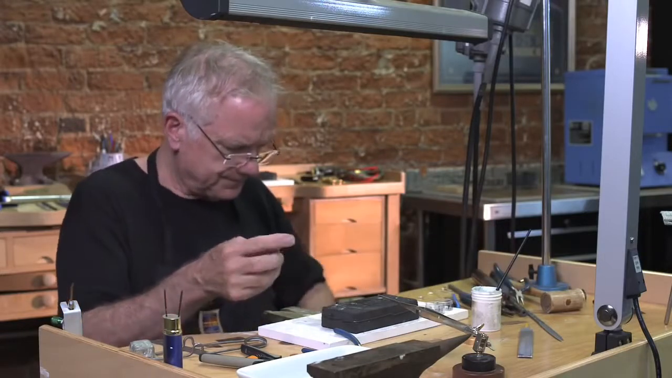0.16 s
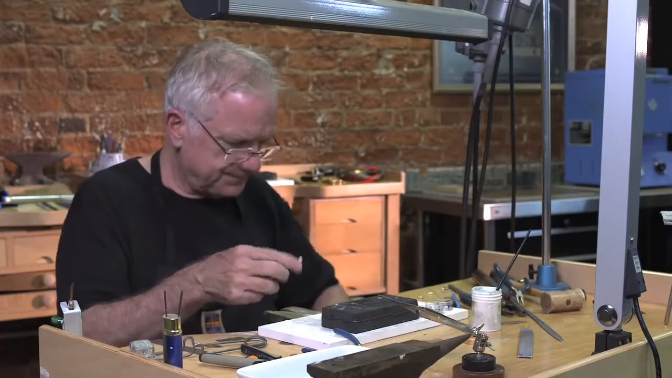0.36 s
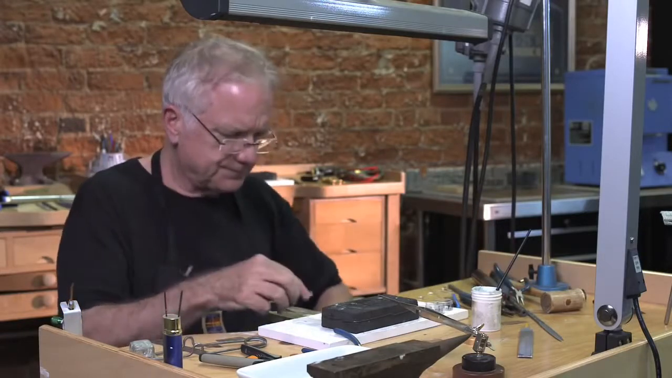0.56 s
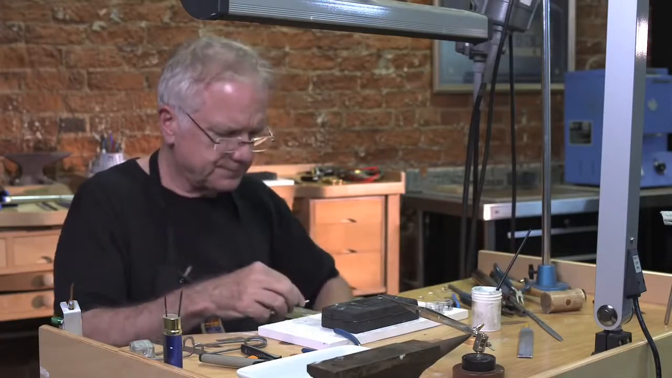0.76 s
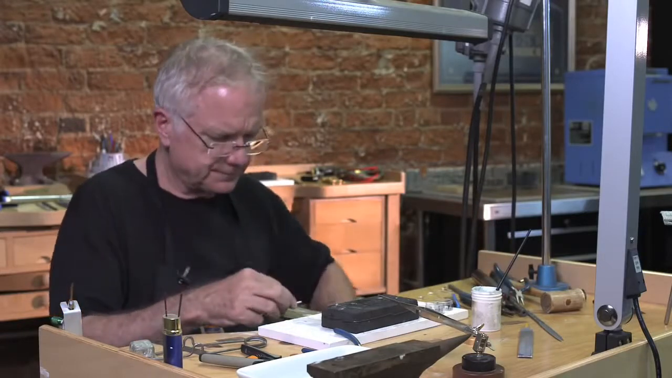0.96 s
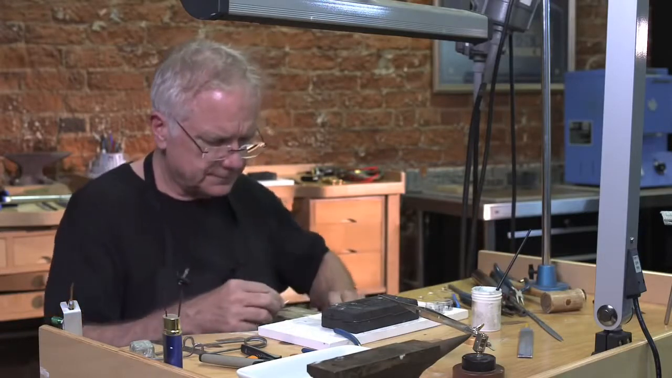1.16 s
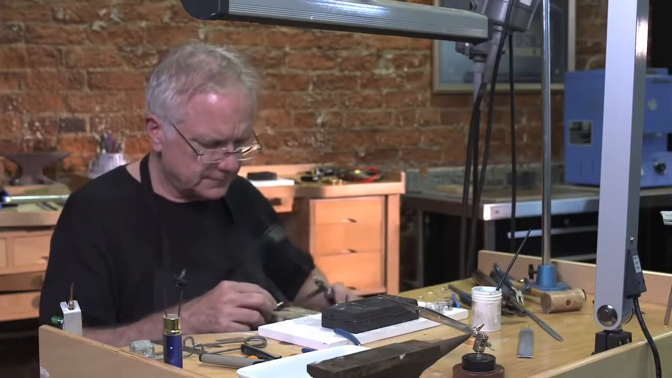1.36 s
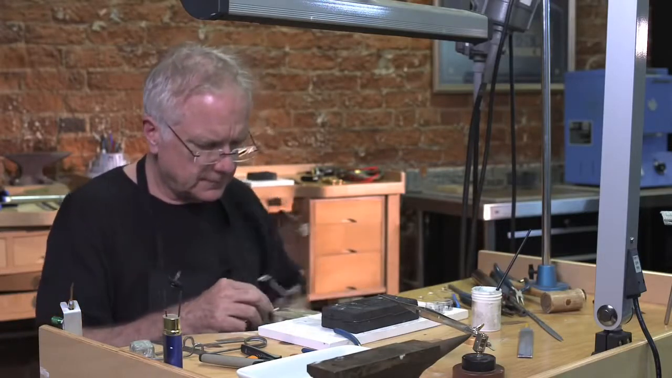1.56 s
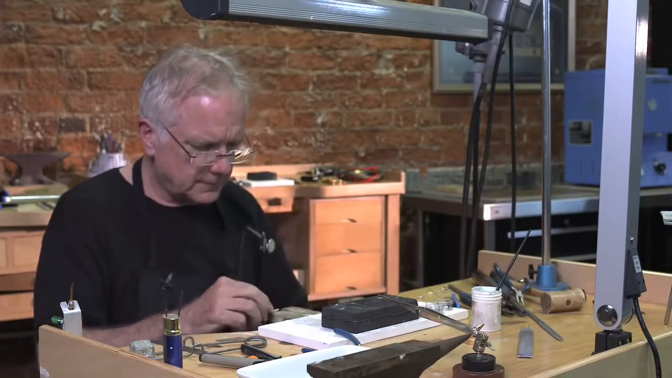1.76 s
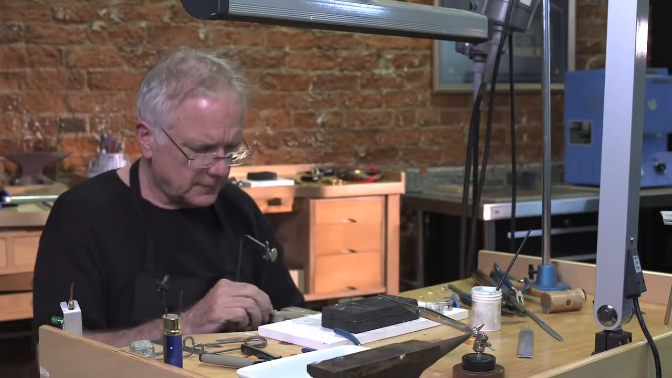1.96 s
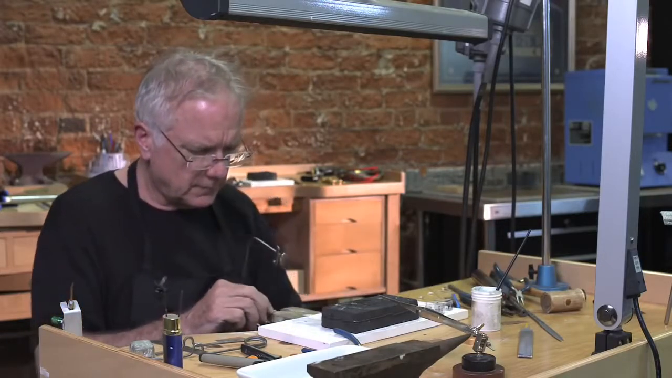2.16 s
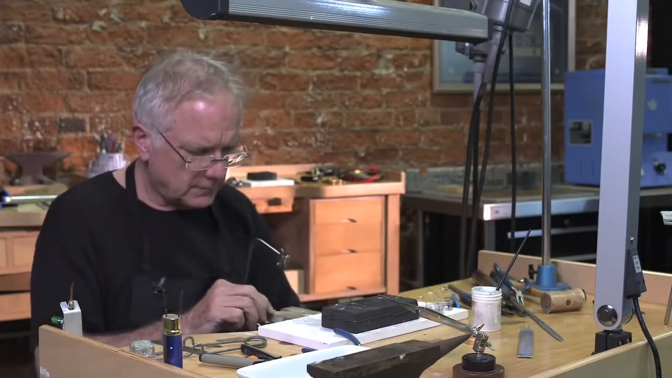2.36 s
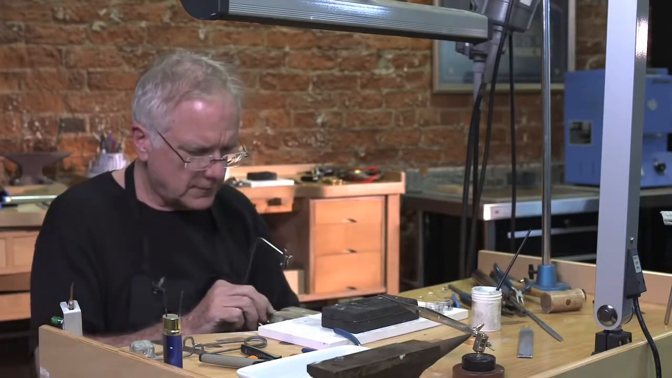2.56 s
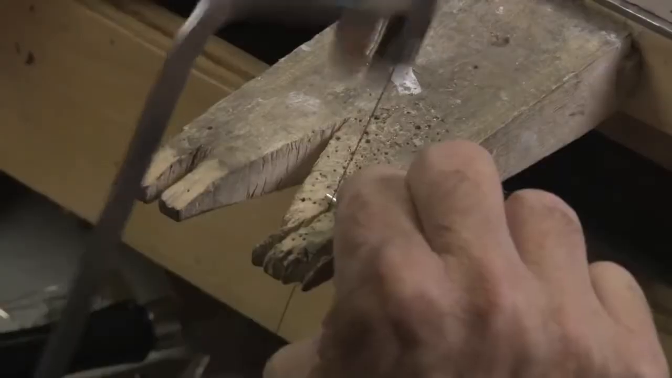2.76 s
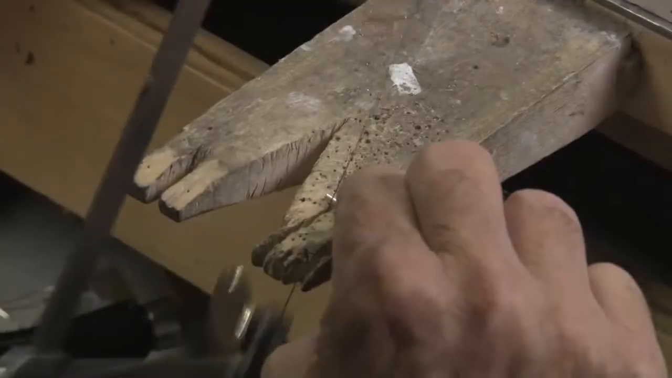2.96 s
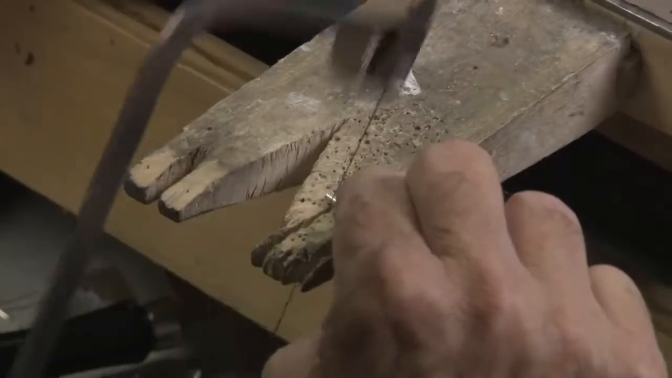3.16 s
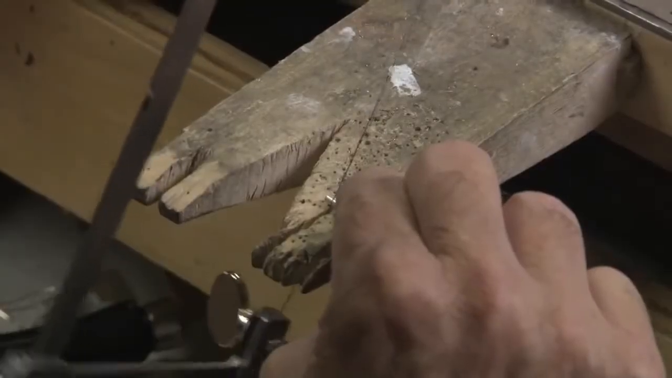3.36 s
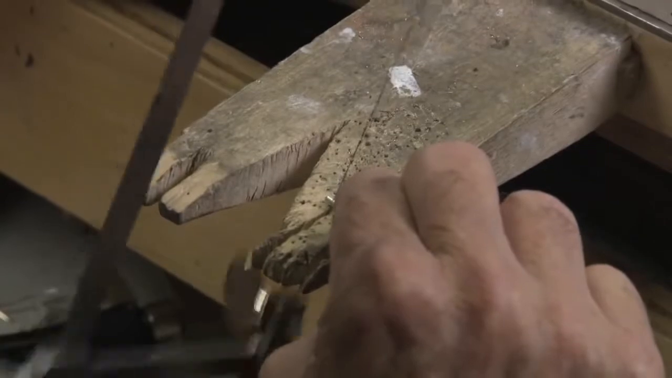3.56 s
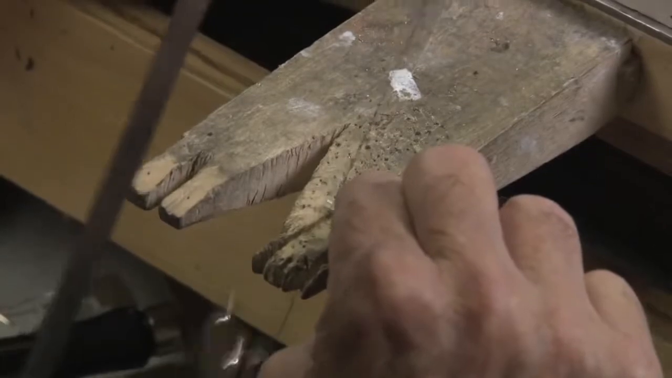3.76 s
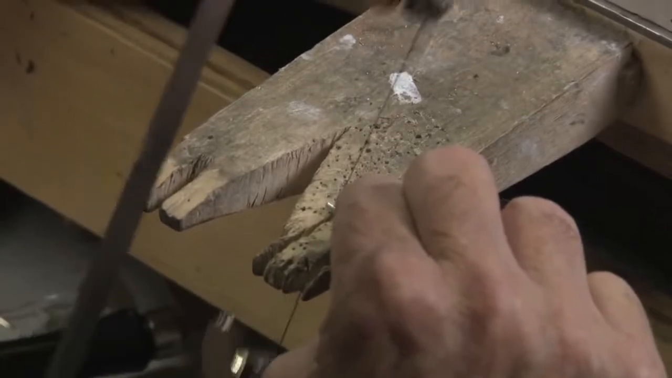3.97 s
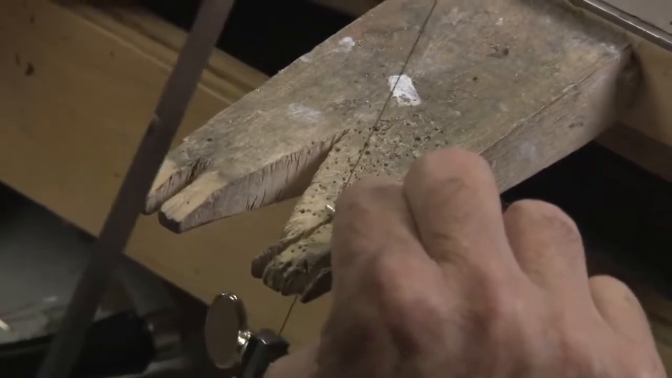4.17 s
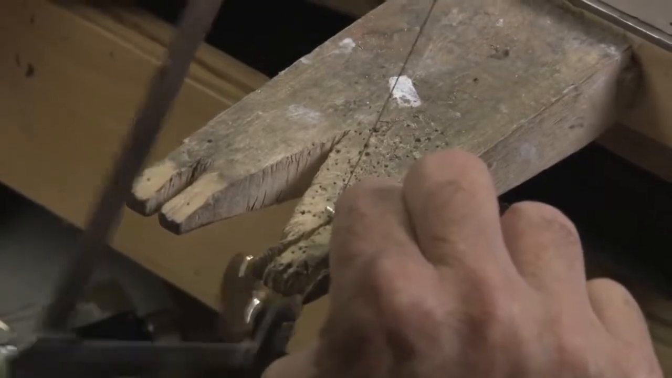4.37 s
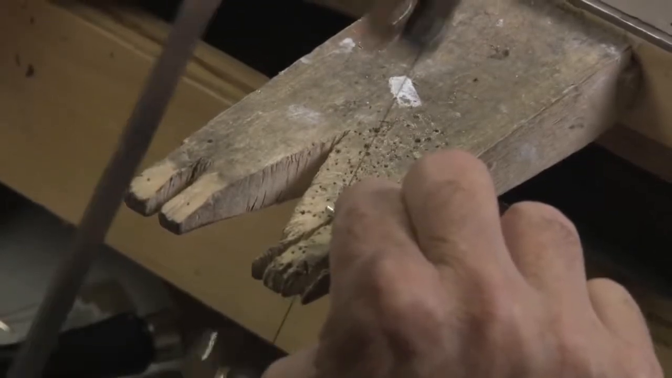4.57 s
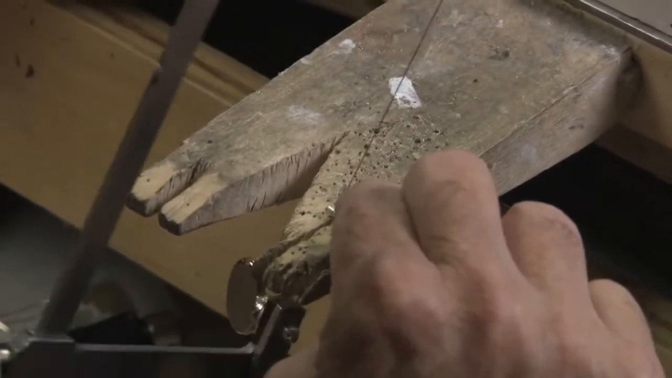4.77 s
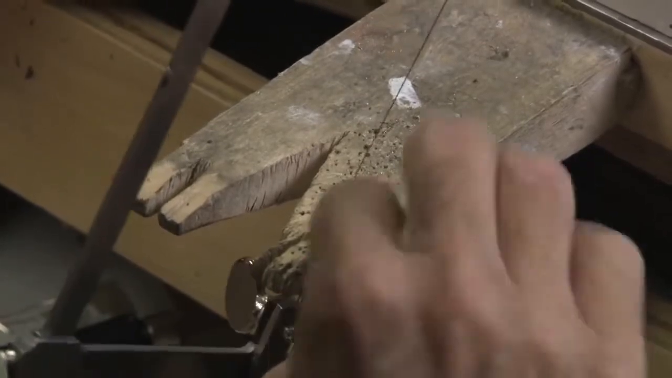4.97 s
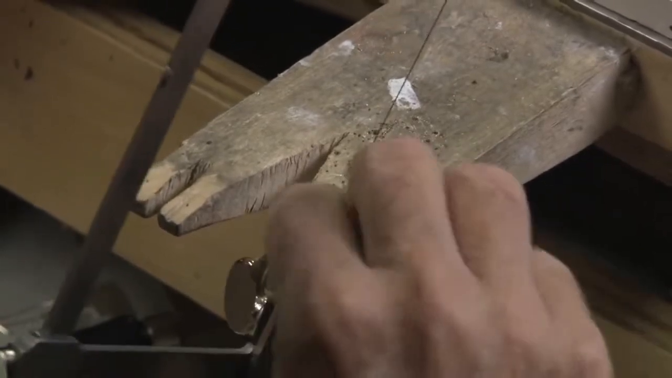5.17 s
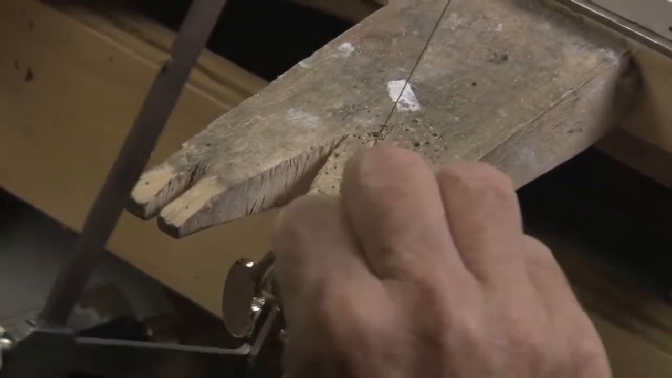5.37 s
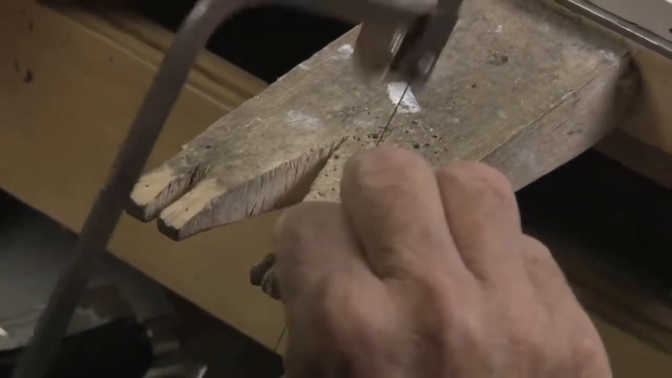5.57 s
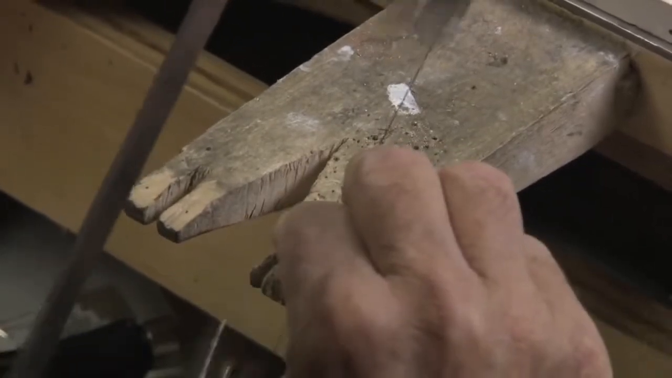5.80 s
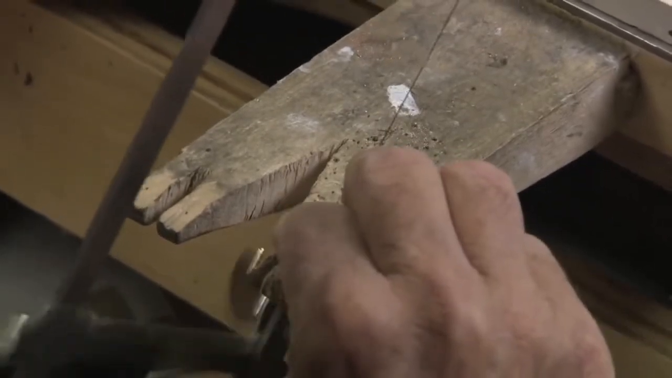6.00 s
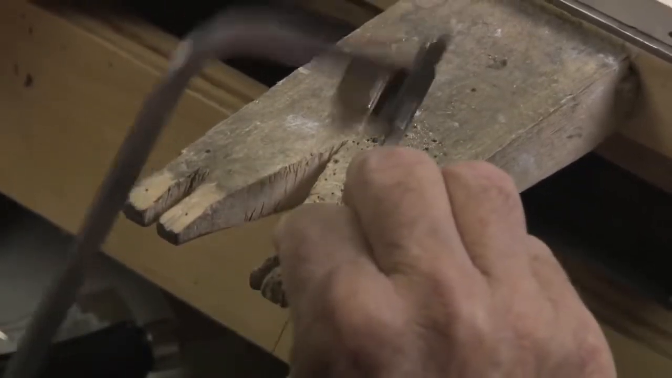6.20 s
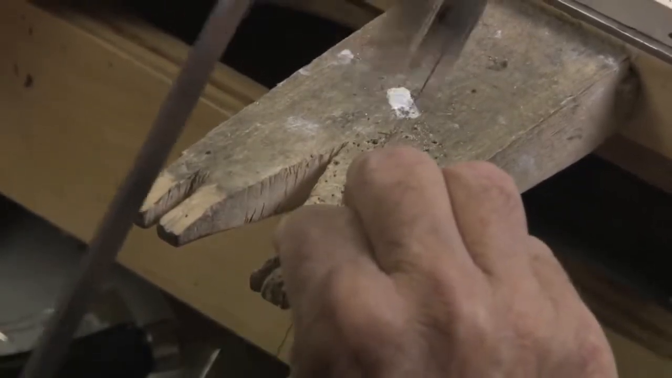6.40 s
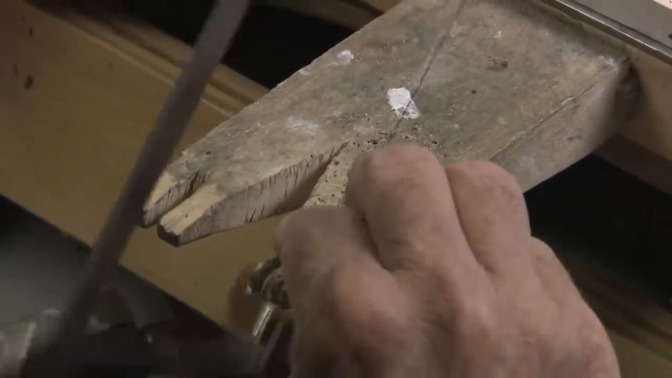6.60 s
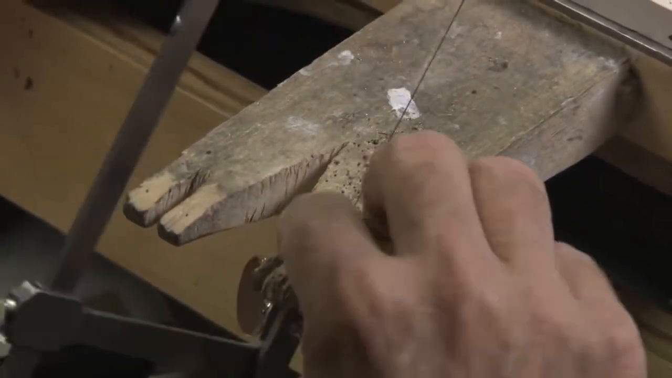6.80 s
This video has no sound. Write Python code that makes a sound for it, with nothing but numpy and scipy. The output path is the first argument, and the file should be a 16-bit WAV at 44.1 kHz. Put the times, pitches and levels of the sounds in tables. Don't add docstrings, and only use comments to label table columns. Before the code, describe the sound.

A close microphone at a wooden bench in a small, quiet workshop with low hum. From 0 to 0.3 s there is only faint handling; from 0.35 to 0.95 s small steel tools knock and slide on wood, with bright tweezer-like ringing around 0.4-0.55, a sharp clack at 0.65 and a tiny high ping near 0.88. Quiet follows, with light ticks at 1.1 and 1.5. At 2.6 s a fine saw catches and rasps thin metal tube: short zipping strokes to 2.9, another pair 2.96-3.3, each rising and falling in pitch. Rougher, snagging strokes come at 3.55-4.05 and 4.2-4.7, slower and grainier around 4 and 4.3, with woody jolts and metallic snaps. A pause holds a soft bench rumble and faint tick. From 5.4 s sawing resumes, soon becoming faster, regular, brighter and squealing, strokes about every 0.15 s, softening by 6.65 into quiet with a faint rumble.

```python
import sys
import numpy as np
from scipy import signal
from scipy.fft import rfft, irfft, next_fast_len
from scipy.io import wavfile
from scipy.ndimage import uniform_filter1d

SR = 44100
rng = np.random.default_rng(int(sys.argv[2]) if len(sys.argv) > 2 else 0)


def invert_db(x):
    u = np.asarray(x, float) / 20
    return 10 ** u


def dump(signal):
    limited = np.clip(np.atleast_2d(signal).T, -1, 1)
    pcm = np.round(limited * 32767).astype(np.int16)
    wavfile.write(sys.argv[1], SR, pcm)


N = 301644
T = np.arange(N) / SR
SIZE = next_fast_len(N + SR // 4)
HZ = np.arange(SIZE // 2 + 1) * SR / SIZE

# start_s, tube_db, pin_db, wall_db, hiss_db
CATCHES = [(2.598, -28.5, -26, -34.5, -42.5), (2.638, -49, -38, -46, -39), (2.65, -25.5, -17, -50, -53),
           (2.965, -32, -65, -36, -51), (3.027, -37, -22, -46, -50), (3.041, -40, -46, -28, -36),
           (3.085, -29, -16.5, -28, -39), (3.29, -39, -22.5, -45, -56), (3.543, -41, -38, -40, -42.5),
           (3.71, -40, -22.5, -45, -49.5), (3.73, -41, -38, -32.5, -45), (3.766, -39, -45, -29, -40),
           (3.777, -48, -45.5, -32, -34), (3.782, -23.5, -16.5, -31, -27.5), (3.856, -38, -25, -58, -46.5),
           (3.91, -51, -51, -50, -57), (3.973, -44, -35, -45, -38.5), (4.057, -50, -40, -52, -64.5),
           (4.074, -52, -42, -57, -65), (4.244, -52, -45, -48, -58), (4.378, -31, -20.5, -38, -56),
           (4.404, -23, -50, -35, -58), (4.418, -39, -33, -26.5, -35), (4.439, -36, -28, -30, -41),
           (4.5, -25, -16.5, -30, -46), (4.528, -47, -40, -43, -46), (4.695, -45, -21.5, -56, -57),
           (5.441, -23.5, -23, -41, -44), (5.493, -35, -22, -42, -58), (5.781, -20.5, -35, -33, -51),
           (5.827, -27, -50, -28.5, -40.5), (6.067, -26.5, -52, -48, -63), (6.42, -33, -21, -34, -36.5)]
SHIFT_S = 5.2


def saw():
    tooth, phase, rough, rate, edge = teeth()
    tube_gain, pin_gain, wall_gain, hiss_gain = cut(rate)
    shifted = T > SHIFT_S
    clean = np.sqrt(1 - rough) * tooth
    drive = clean + np.sqrt(rough) * grit(5000, spread_db=4.0)
    swarf = np.exp(-phase / 0.45) * grit(12000, spread_db=0.5)
    start_s, tube_db, pin_db, wall_db, hiss_db = np.transpose(CATCHES)
    out = tube(tube_gain, drive, clean, edge, shifted, bursts(start_s, tube_db - 10.0, 0.0059))
    wall_drive = 0.74 * (drive + (edge - 1) * clean) + 0.59 * swarf
    out = out + tube_wall(wall_gain * wall_drive + bursts(start_s, wall_db - 7.0, 0.0044))
    jolts = clicks(start_s, invert_db(np.minimum(pin_db, -18) + 8.5))
    out = out + wooden_pin(pin_gain * (drive + 0.48 * grit(500, spread_db=3.5)) + jolts)
    out = out + blade(hiss_gain, drive, swarf, shifted, bursts(start_s, hiss_db - 1.5, 0.0032))
    return out + left_ringing()


# start_s, end_s, mid_stroke_teeth_hz, roughness_0_to_1, far_wall_lag_tooth_gaps
STROKES = [(2.579, 2.71, 796, 0.95, 0.38), (2.714, 2.911, 958, 0.22, 0.075),
           (2.962, 3.13, 1308, 0.56, 0.29), (3.119, 3.317, 943.4, 0.25, 0.19),
           (3.528, 3.67, 905.4, 0.77, 0.18), (3.679, 3.762, 797, 1, 0.26), (3.749, 3.808, 1298, 0.61, 0.18),
           (3.829, 3.893, 592.5, 0.8, 0.39), (3.871, 4.08, 348.4, 0.52, 0.086),
           (4.211, 4.412, 380, 0.46, 0.09), (4.372, 4.472, 1000, 0.6, 0.19),
           (4.479, 4.542, 898.6, 0.63, 0.12), (4.522, 4.728, 676.8, 0.24, 0.13),
           (5.41, 5.534, 1121, 0.4, 0.29), (5.56, 5.729, 980, 0.24, 0.21), (5.766, 5.877, 1399, 0.41, 0.4),
           (5.883, 6.039, 1253, 0.32, 0.42), (6.048, 6.199, 1608, 0.41, 0.35),
           (6.189, 6.342, 1388, 0.42, 0.39), (6.34, 6.495, 1385, 0.45, 0.29),
           (6.501, 6.657, 1311, 0.5, 0.4)]
# settling_share_of_stroke, overtone_db
RUN = [(.1, -10), (0.34, 0), (0.11, -3.5), (.28, -1), (.1, 0), (.1, -1.5), (.1, -0.5), (.1, -1.5),
       (0.11, -1), (0.24, -2.5), (.15, -7), (0.082, 2), (0.25, 0.5), (0.14, 0.5), (0.13, -3), (0.082, 0.5),
       (0.15, -1.5), (0.11, 3.5), (.25, 0), (.1, 2), (0.27, -3.5)]


def teeth():
    rate, rough, lag, edge = np.full(N, 60.), np.ones(N), np.zeros(N), np.ones(N)
    for (start, end, top_hz, r, gap), (settle, edge_db) in zip(STROKES, RUN):
        now = (T >= start) & (T < end)
        progress = (T[now] - start) / (end - start)
        rate[now] = 60 + (top_hz - 60) * np.sin(np.pi * progress)
        clog = (r > .42) * progress
        rough[now] = np.clip(r, .01, 1) ** (1.25 - clog)
        rough[now] **= 1 / (1 + np.exp((settle - progress) / .04))
        lag[now], edge[now] = gap, invert_db(edge_db)
    rate = rate * (1 + .014 * wander(50) + .008 * wander(260))
    rough = rough ** (1.6 * invert_db(2.5 * wander(45)))
    phase = np.cumsum(rate) / SR
    tooth = np.arange(1, int(phase[-1]) - 1)
    spacing, height = rng.standard_normal((4000, 2))[:len(tooth)].T
    jitter = .022 + .06 * np.interp(tooth, phase, rough)
    at = np.interp(tooth + jitter * spacing, phase, T)
    uneven_db = 1.8 * height + 3.2 * np.interp(at, T, wander(70))
    size = np.sqrt(SR / np.interp(at, T, rate)) * invert_db(uneven_db)
    near_wall = 0.96 * clicks(at, size)
    far_size = size * (0.24 + 0.72 * np.interp(at, T, lag))
    far_wall = clicks(at + np.interp(at, T, lag / rate), far_size)
    rough = uniform_filter1d(rough, size=200).clip(0, 1)
    return near_wall + far_wall, phase % 1, rough, rate, edge


# bites_s, heaviest_s, lifts_s, bite_db, heaviest_db
PRESS = [(2.612, 2.667, 2.657, -49, -40.5), (2.72, 2.828, 2.884, -55.5, -41.5),
         (2.963, 3.055, 3.056, -48, -35.5), (3.105, 3.25, 3.29, -52, -40), (3.549, 3.54, 3.62, -49.5, -45),
         (3.698, 3.724, 3.72, -49, -36), (3.768, 3.77, 3.78, -45, -35.5), (3.846, 3.855, 3.98, -60, -58.5),
         (3.918, 3.969, 4.022, -45, -43.5), (4.233, 4.293, 4.31, -60.5, -48.5),
         (4.401, 4.414, 4.43, -45.5, -34), (4.497, 4.498, 4.5, -49, -38), (4.556, 4.596, 4.674, -47, -47),
         (5.438, 5.505, 5.502, -38.5, -31.5), (5.549, 5.615, 5.71, -54.5, -43.5),
         (5.777, 5.837, 5.82, -40, -37.5), (5.885, 5.9, 6.02, -66, -49.5), (6.062, 6.089, 6.15, -48, -40.5),
         (6.196, 6.27, 6.33, -55.5, -49.5), (6.362, 6.43, 6.446, -50.5, -43),
         (6.49, 6.503, 6.64, -68, -63.5)]
# firmness_on_pin_db, dryness_of_blade_db
SEAT = [(2, 2.5), (-2, 3), (-2, 2), (-4, 2), (5.5, 1.5), (5.5, -10), (4, 1), (2, 4), (-3, 4), (0, 2),
        (4, 1.5), (-6.5, 5.5), (-4.5, 2), (-0.5, -4.5), (-5.5, -4.5), (-1.5, -5), (-4.5, -1), (2.5, -1.5),
        (-1, -1.5), (5, -3.5), (-10.5, 1)]
BITE_DB_S, PIN_BITE_DB_S, SAG_DB_S, LIFT_DB_S = 1001, 1297.5, 60, 559.5
DULL_DB_S = 302
EDGE = 0.32
PIN_DB, WALL_DB, HISS_DB = -1.5, -4.5, -10
PIN_DB_OCT, WALL_DB_OCT, HISS_DB_OCT = -5, 3.5, 3.5


def cut(rate):
    octaves = uniform_filter1d(np.log2(rate / 800), size=400).clip(-2.2, 1)
    tube_gain, pin, wall, hiss = np.zeros((4, N))
    for row, (firm_db, dry_db) in zip(PRESS, SEAT):
        lifts_s, heaviest_db = row[2], row[4]
        db = weight(*row, BITE_DB_S, SAG_DB_S, LIFT_DB_S)
        pin_db = weight(*row, PIN_BITE_DB_S, SAG_DB_S, LIFT_DB_S) + firm_db
        bright_db = db + dry_db - DULL_DB_S * (T - lifts_s).clip(0)
        tube_gain = tube_gain + invert_db(db)
        pin = pin + invert_db(pin_db)
        wall = wall + invert_db(bright_db)
        hiss = hiss + invert_db(bright_db + 0.38 * dry_db + EDGE * (db - heaviest_db))
    pin = pin * invert_db(PIN_DB + PIN_DB_OCT * octaves)
    wall = wall * invert_db(WALL_DB + WALL_DB_OCT * octaves)
    hiss = hiss * invert_db(HISS_DB + HISS_DB_OCT * octaves)
    return tube_gain, pin, wall, hiss


# freq_hz, level_db_per_hz
TUBE = [(250, -23.5), (430, -14), (503, 5), (643, -6), (689, 0), (795, 2.5), (869, 0), (989, -8),
        (1190, -5), (1400, -6.5), (1830, -4), (2200, -8.5), (2860, -61), (4840, -120)]
# freq_hz, width_hz, level_db
SQUEAL = [(838, 44, 11.5), (1190, 100, -2.5), (1800, 130, -12), (2520, 82, -11), (3730, 150, -4.5)]
# freq_hz, width_hz, level_db
SQUEAL_SHORT = [(856, 50, 4), (1173, 33, -2.5), (1512, 30, -5.5), (1797, 35, 3), (2533, 177, -12.5),
                (2850, 44.2, -17), (3229, 94.7, -15), (3672, 40, -13)]


def tube(gain, drive, clean, edge, shifted, jolts):
    out = colour(0.92 * gain * drive + jolts, TUBE)
    out = out + ring(0.46 * ~shifted * gain * clean, SQUEAL)
    return out + ring(0.82 * shifted * edge * gain * clean, SQUEAL_SHORT)


# freq_hz, level_db_per_hz
TUBE_WASH = [(1410, -22.5), (2400, -6), (2520, 2), (2720, -5), (2870, -0.5), (3040, -8.5), (3250, 0.5),
             (3440, -5.5), (3700, 1), (4110, -8), (5200, -15), (6760, -32.5), (11400, -120)]


def tube_wall(x):
    return colour(x, TUBE_WASH)


# freq_hz, width_hz, level_db
PIN = [(110.6, 15, -7), (203, 39, -13), (250, 22.2, 2.5), (363.5, 37.5, -8)]


def wooden_pin(x):
    return ring(x, PIN)


# freq_hz, level_db_per_hz
BLADE = [(2940, -27.5), (5000, 3), (5640, 1), (6030, 2), (6550, 2), (7070, 6), (8250, -1.5), (8910, 2.5),
         (10400, -3.5), (11800, -11), (13000, -7), (13400, -5), (14100, -10), (14800, -19.5),
         (15800, -11.5)]
# freq_hz, width_hz, level_db
SNAP = [(4460, 1700, 2.5), (9200, 2300, 3), (14130, 2200, 1.5)]
# freq_hz, width_hz, level_db
BLADE_MODES = [(4750, 120, 0), (4960, 160, 1), (6130, 220, -3.5), (7010, 190, -0.5), (7230, 100, -3),
               (7200, 43, -3), (8750, 58, 1.5), (9640, 260, -6), (10800, 28, -10), (13100, 71, -8.5),
               (13000, 64, -2), (14900, 140, -2.5), (15000, 58, -6)]
# freq_hz, width_hz, level_db
CLAMP_MODES = [(4730, 67, -1.5), (5300, 75.9, -3), (5992, 130, -4), (6840, 45, -7), (7074, 77.6, -22),
               (7396, 87, -10), (8232, 190, -22), (9566, 210, -5), (9800, 99.4, 0), (11200, 51, -1.5),
               (12100, 96, -5), (13740, 300, -5), (15290, 205, -17)]


def blade(gain, drive, swarf, shifted, cracks):
    out = colour(gain * invert_db(2.5 * wander(60)) * (0.19 * drive + 1.6 * swarf), BLADE)
    out = out + ring(cracks, SNAP)
    before = ~shifted * gain * invert_db(1.8 * wander(40)) * (0.37 * drive + 0.79 * swarf)
    after = shifted * gain * invert_db(3.6 * wander(40)) * (0.39 * drive + 1.2 * swarf)
    return out + ring(invert_db(-1.5) * before, BLADE_MODES) + ring(invert_db(-1.0) * after, CLAMP_MODES)


# start_s, level_db, pitch_hz, t60_s
FRAME = [(2.653, -35, 250, 0.13), (3.024, -35.5, 2525, 0.094), (3.088, -37.5, 250, .09),
         (3.769, -42, 1270, .05), (3.785, -36, 255, .1), (4.44, -37, 244.4, .11), (5.455, -38, 1185, .12),
         (5.501, -40, 1187, 0.22), (5.826, -35, 1180, 0.17), (6.423, -43, 1305, 0.24),
         (6.425, -40, 250, .1)]


def left_ringing():
    return sum(struck([(s, db)], [(hz, 0)], t60) for s, db, hz, t60 in FRAME)


# start_s, wood_db, click_db, tick_db, wood_pitch_hz
KNOCKS = [(0.015, -60, -60, -66, 402), (0.045, -49, -49, -58, 325), (0.12, -69, -67, -68, 396),
          (0.279, -50.5, -62.5, -68, 557), (0.338, -62, -65, -72, 400), (0.348, -24, -50.5, -57, 313),
          (0.404, -48, -58, -24.5, 290), (0.419, -27.5, -77, -58.5, 330), (0.462, -39, -52, -30, 253),
          (0.48, -31, -48, -78, 406), (0.494, -30, -51, -33, 436), (0.515, -27.5, -49, -38, 440),
          (0.564, -37, -54.5, -46, 794), (0.6, -45, -58, -70, 400), (0.615, -20.5, -51, -56, 226),
          (0.62, -35, -47, -49, 404), (0.648, -24, -37.5, -32, 203), (0.684, -28, -47, -49, 388),
          (0.753, -31, -45, -46, 290), (0.8, -43.5, -60.5, -76, 480), (0.869, -37.5, -40, -46.5, 505),
          (0.881, -34, -52, -55.5, 211), (0.908, -37.5, -50, -58.5, 216), (3.416, -60, -61.5, -61.5, 250)]
# freq_hz, width_hz, level_db
BENCH = [(243, 64, 2), (339.4, 136, 1.5), (473, 210, 0), (816, 500, -6.5)]
# freq_hz, width_hz, level_db
BENCH_TOP = [(2190, 170, -1), (2958, 150, -2), (4288, 76, 0)]
# freq_hz, width_hz, level_db
BENCH_HISS = [(5860, 3100, -3), (8950, 4500, 1.5), (13500, 4500, -5)]
TWEEZERS_HELD_S, TWEEZERS_T60_S = 0.555, 0.12


def bench():
    wood, scrape, hiss = slides()
    start_s, wood_db, click_db, tick_db, pitch_hz = np.transpose(KNOCKS)
    hiss = hiss * invert_db(-12 * ((T > .36) & (T < TWEEZERS_HELD_S)))
    out = ring(wood * invert_db(-3) * grit(400, spread_db=2.5), BENCH)
    grains = 0.87 * grit(500, spread_db=2.0) * (T > .33) + 0.77 * grit(9000, spread_db=1.0)
    out = out + ring(scrape * invert_db(-2.0) * grains + bursts(start_s, click_db + 1.0, 0.0058), BENCH_TOP)
    out = out + ring(hiss * grit(1700, spread_db=4.5) + bursts(start_s, tick_db - 11, 0.011), BENCH_HISS)
    for s, db, hz in zip(start_s, wood_db, pitch_hz):
        out = out + struck([(s, db - 6.5)], [(hz, 0), (1.5 * hz, -6)], 0.049)
    return out + tweezers() + tweezers_landing() + steel_file()


# touches_s, lifts_s, wood_db, scrape_db, hiss_db
SLIDES = [(0.0, 0.2, -51, -59, -77), (0.281, 0.32, -57.5, -66.5, -80), (0.351, 0.358, -36, -60, -73),
          (0.375, 0.43, -54, -61.5, -44), (0.403, 0.44, -51.5, -55, -34), (0.464, 0.49, -41.5, -65, -41),
          (0.488, 0.53, -36.5, -58, -34), (.612, 0.628, -38.5, -58, -70), (0.648, 0.689, -35.5, -58, -52.5),
          (0.755, 0.74, -33, -69, -80), (0.877, 0.91, -43, -50.5, -60.5), (0.946, 0.97, -57.5, -78, -98)]
TOUCH_DB_S, SLOW_DB_S, LEAVE_DB_S = 2501, 79.5, 600


def slides():
    total = 0
    for touches, lifts, *levels_db in SLIDES:
        shape_db = weight(touches, touches, lifts, 0, 0, TOUCH_DB_S, SLOW_DB_S, LEAVE_DB_S)
        total = total + invert_db(shape_db + np.c_[levels_db])
    return total


# freq_hz, level_db
TWEEZERS = [(4280, -62.0), (5577, -52.0), (6137, -61.5), (6508, -61), (7300, -64.5), (7660, -53.5),
            (8210, -63.0), (9432, -50.5), (10142, -55.0), (11030, -61.5), (11396, -68), (12188, -67.5),
            (13227, -67.0), (2900, -70), (4950, -72)]
# start_s, level_db
TWEEZER_TAPS = [(.368, -2.5), (.404, 7.5), (.43, 5), (.447, 1), (.462, 8), (.482, -0.5), (.5, 6.5),
                (.515, 10.5), (.528, 4.5), (.545, 5)]


def tweezers():
    held = np.exp(-(T - TWEEZERS_HELD_S).clip(0) / 0.008)
    return invert_db(3) * held * struck(TWEEZER_TAPS, TWEEZERS, TWEEZERS_T60_S)


# freq_hz, level_db, t60_s
TWEEZERS_LANDING = [(5577, -8, 0.16), (7420, -25, 0.85), (8253, -21, 0.21), (8926, -8, 0.084), (9512, 4, 0.086),
                    (10990, -27, 0.21), (11420, 6, 0.082), (12260, 1, 0.092), (13670, -10, 0.11)]


def tweezers_landing():
    clack = struck([(.651, -44.5)], [(2995, 5), (5700, 9.5), (2350, -5)], 0.02)
    return clack + sum(struck([(.648, -53), (.662, -56)], [(hz, db)], t60) for hz, db, t60 in TWEEZERS_LANDING)


# freq_hz, level_db
FILE = [(7709, -61), (10239, -59), (12473, -71), (12758, -53), (13124, -60.5)]


def steel_file():
    return struck([(.883, 8.3)], FILE, 0.08)


# start_s, level_db, pitch_hz
TICKS = [(1.111, -45.5, 577), (1.54, -50.5, 1125), (2.339, -76, 678), (5.019, -58, 716)]


def ticks():
    start_s, level_db, _ = np.transpose(TICKS)
    body = sum(struck([(s, db - 5)], [(hz, 0), (1.33 * hz, -4)], 0.037) for s, db, hz in TICKS)
    return body + ring(bursts(start_s, level_db - 18.5, 0.0028), BENCH_TOP)


# start_s, most_s, end_s, start_db, most_db
LEANS = [(0, .08, 0.17, -72, -58), (0.345, .42, 0.54, -56, -55), (3.75, 3.8, 4.24, -67, -58),
         (4.4, 4.48, 4.6, -59, -60), (4.85, 4.95, 5.05, -68, -56.5), (5.103, 5.3, 5.4, -72, -62.5),
         (6.7, 6.82, 6.7, -68.5, -62)]


def lean():
    gain = sum(invert_db(weight(*row, 200, 20, 200)) for row in LEANS)
    return ring(gain * rng.standard_normal(N), [(94, 36, 0), (128, 40, -5)])


def walls(x, t60_low, t60_high):
    t = T[:SR // 3]
    low = signal.lfilter([.2], [1, -.8], rng.standard_normal(len(t))) * np.exp(-np.log(1000) * t / t60_low)
    high = 0.79 * rng.standard_normal(len(t)) * np.exp(-np.log(1000) * t / t60_high)
    tail = (low + high) * (t > .004)
    return signal.fftconvolve(x, tail / np.sqrt(np.sum(tail ** 2)))[:N]


# freq_hz, level_db_per_hz
ROOM = [(15, -56.5), (25, -19.5), (87, -3.5), (114, -4.5), (130, -6.5), (217, -8), (285, -19), (354, -17),
        (840, -28.5), (936, -31), (1560, -36.5), (12500, -49), (15000, -46.5), (15500, -60)]
ROOM_DB = -64


def hum():
    hz, db = np.transpose(ROOM)
    gain = invert_db(np.interp(np.log(HZ + 1), np.log(hz), db))
    x = irfft(rfft(rng.standard_normal(SIZE)) * gain, SIZE)[:N]
    swell_db = np.interp(T, np.arange(60) / 8, rng.standard_normal(60))
    return x / x.std() * invert_db(ROOM_DB + swell_db)


def weight(on, top, off, on_db, top_db, rise, sag, fall):
    swell = np.interp(T, [on, max(top, on + 1e-4)], [on_db, top_db])
    return swell - rise * (on - T).clip(0) - sag * (T - top).clip(0) - fall * (T - off).clip(0)


def struck(taps, lines, t60):
    out = np.zeros(N + SR)
    hz, db = np.transpose(lines)[:, :, None]
    age = T[:int(min(t60, .9) * SR)]
    decay = np.exp(-np.log(1000) * age / t60)
    for s, tap_db in taps:
        size = invert_db(db + tap_db + 3 * rng.standard_normal(hz.shape))
        i = int(s * SR)
        out[i:i + len(age)] += np.sum(size * np.sin(2 * np.pi * hz * age), axis=0) * decay
    return out[:N]


def ring(x, modes):
    gain = 0
    for k, (hz, width, db) in enumerate(modes):
        damping = 1j * HZ * width
        gain = gain + (-1) ** k * invert_db(db) * damping / (hz ** 2 - HZ ** 2 + damping)
    return irfft(rfft(x, SIZE) * gain, SIZE)[:N] / np.sqrt(np.mean(abs(gain) ** 2))


def colour(x, spectrum):
    hz, db = np.transpose(spectrum)
    gain = invert_db(np.interp(np.log(np.arange(1, 2050) * SR / 4096), np.log(hz), db))
    cepstrum = irfft(np.log(gain))
    cepstrum[1:2048] *= 2
    cepstrum[2049:] = 0
    response = irfft(np.exp(rfft(cepstrum)))[:1500]
    return signal.fftconvolve(x, response / np.sqrt(np.sum(response ** 2)))[:N]


def clicks(times, sizes):
    at = np.asarray(times) * SR
    i = at.astype(int)
    early = np.bincount(i, sizes * (1 - at + i), N + 2)
    late = np.bincount(i + 1, sizes * (at - i), N + 2)
    return (early + late)[:N]


def bursts(times, db, decay_s):
    keep = np.exp(-1 / (decay_s * SR))
    return signal.lfilter([1], [1, -keep], clicks(times, invert_db(db))) * rng.standard_normal(N)


def grit(rate, spread_db):
    grains = rng.random(N) < rate / SR
    size = invert_db(spread_db * rng.exponential(1, N).clip(0, 3))
    x = grains * size * rng.standard_normal(N)
    return x / x.std()


def wander(rate):
    steps = np.arange(int(N / SR * rate) + 2)
    return np.interp(T * rate, steps, rng.standard_normal(len(steps)))


def scene():
    near = saw() + bench() + ticks()
    near = signal.sosfilt(signal.butter(2, 90, "high", fs=SR, output="sos"), near)
    echoes = invert_db(-16.5) * walls(near, 0.38, 0.055)
    return (near + echoes + hum() + lean())[None]


def low_pass(x):
    return signal.sosfilt(signal.butter(12, 16670, fs=SR, output="sos"), x)


def record(dry):
    top = signal.ellip(12, .2, 45, 15850, fs=SR, output="sos")
    return low_pass(signal.sosfilt(top, dry))


dry = scene()
out = record(dry)
dump(out)
```